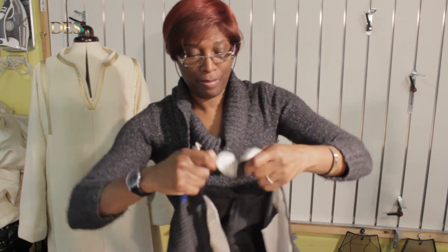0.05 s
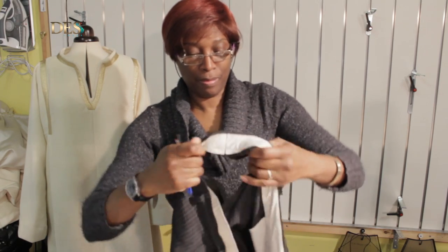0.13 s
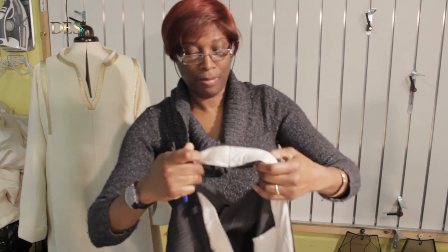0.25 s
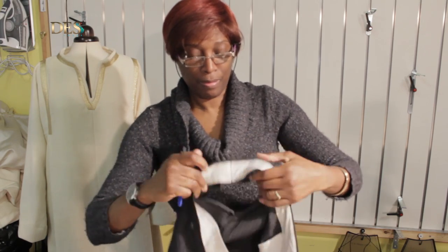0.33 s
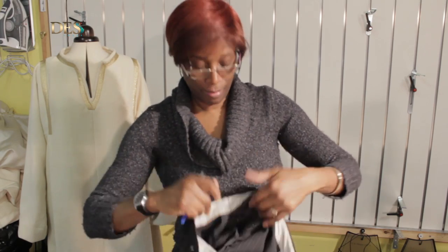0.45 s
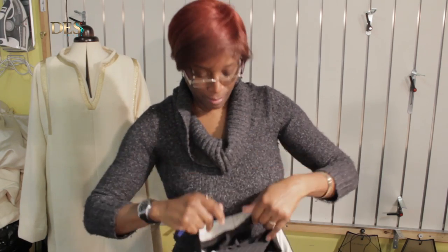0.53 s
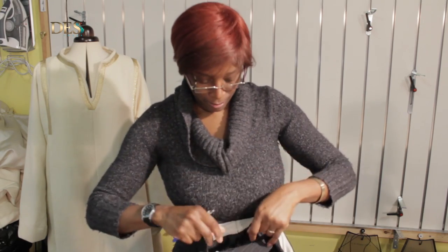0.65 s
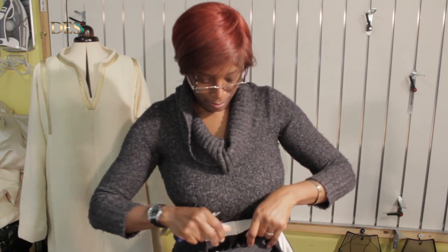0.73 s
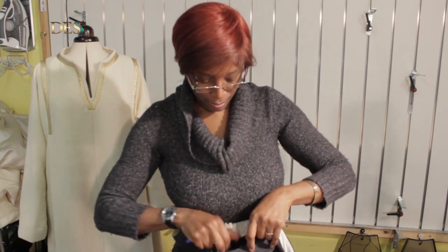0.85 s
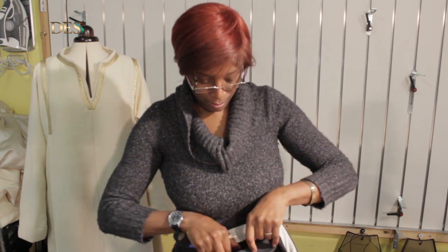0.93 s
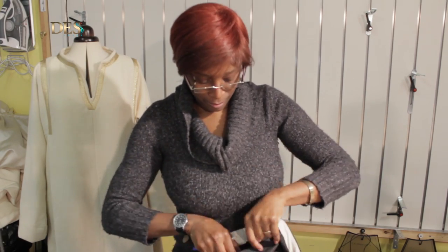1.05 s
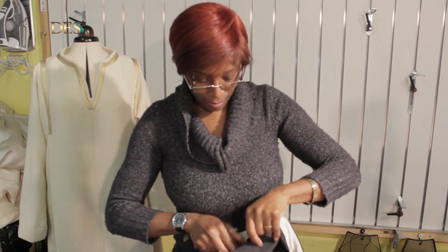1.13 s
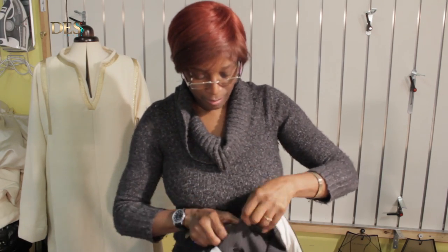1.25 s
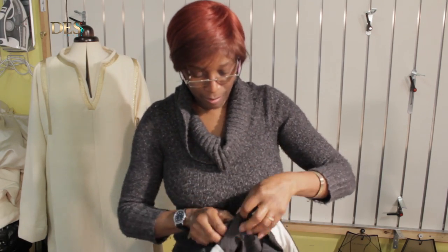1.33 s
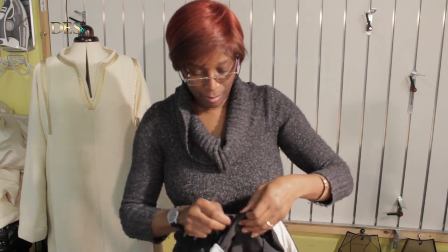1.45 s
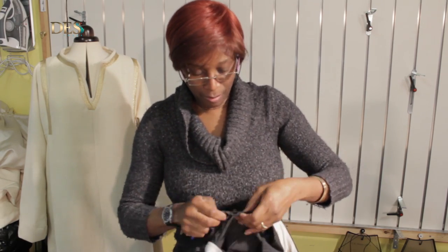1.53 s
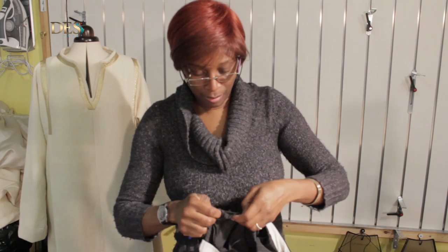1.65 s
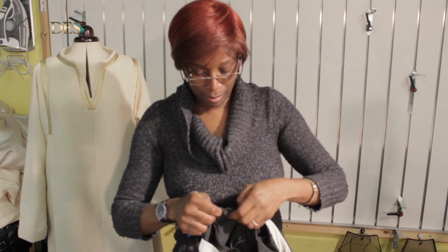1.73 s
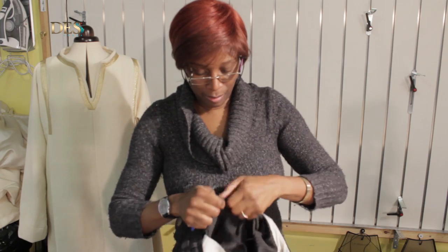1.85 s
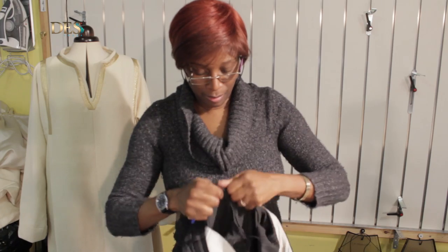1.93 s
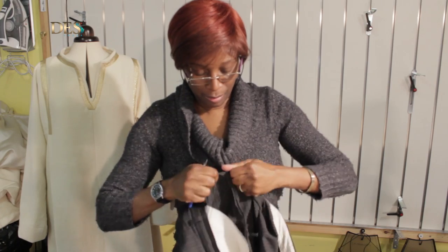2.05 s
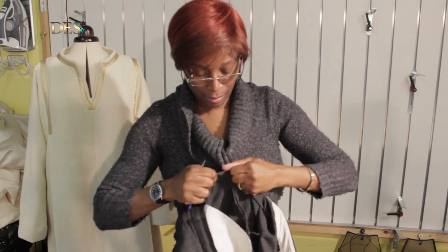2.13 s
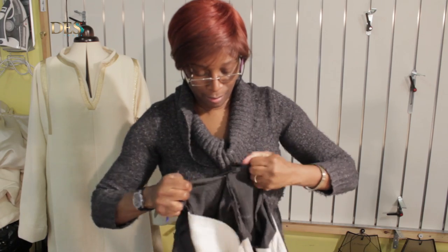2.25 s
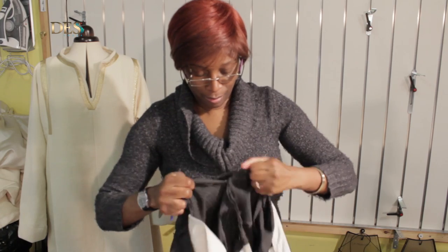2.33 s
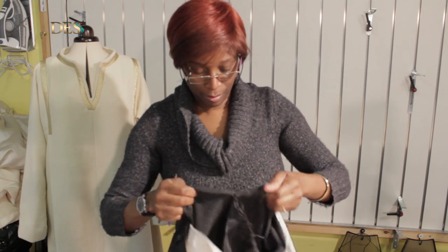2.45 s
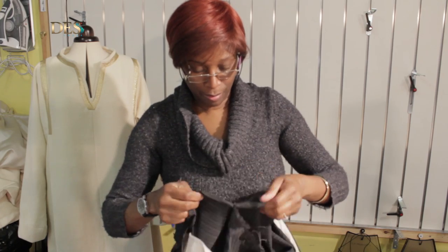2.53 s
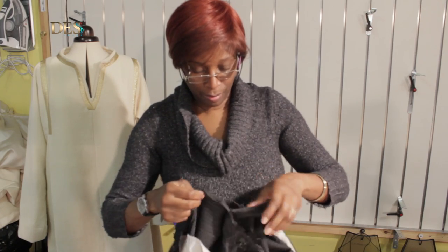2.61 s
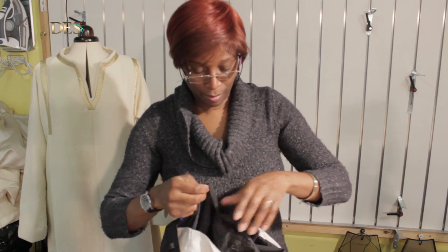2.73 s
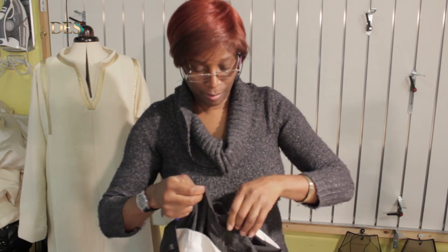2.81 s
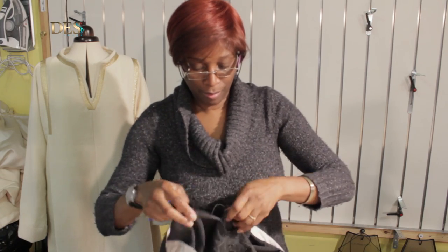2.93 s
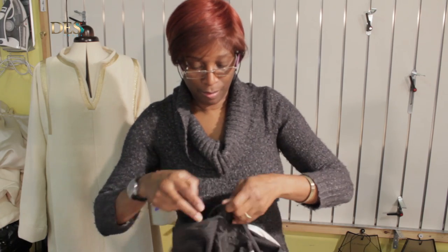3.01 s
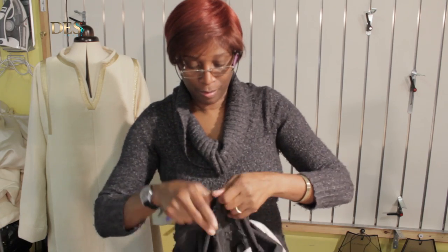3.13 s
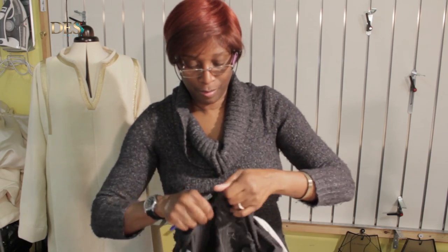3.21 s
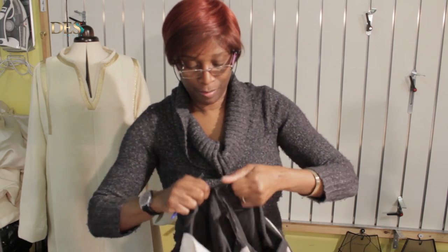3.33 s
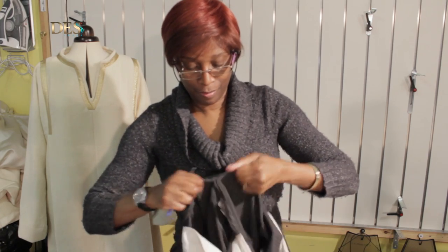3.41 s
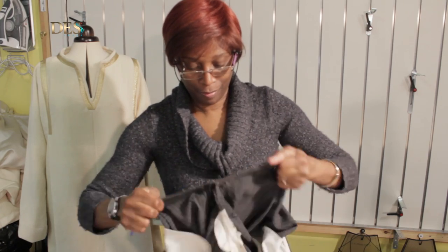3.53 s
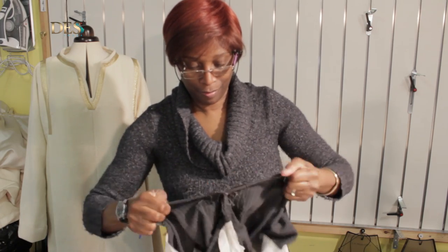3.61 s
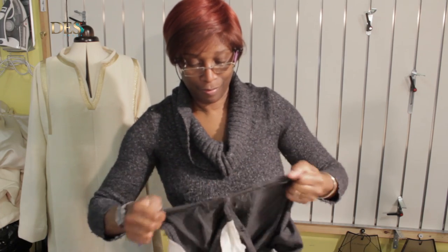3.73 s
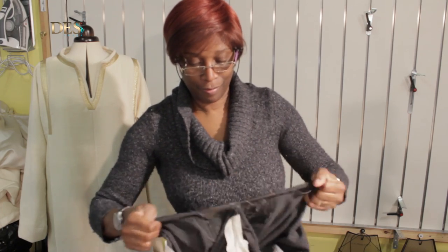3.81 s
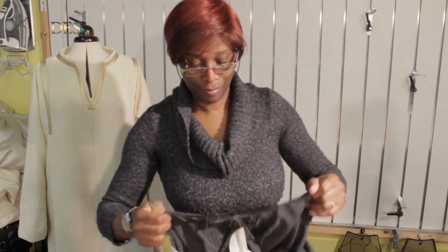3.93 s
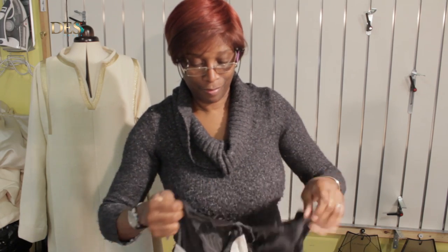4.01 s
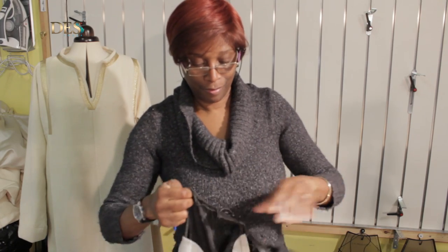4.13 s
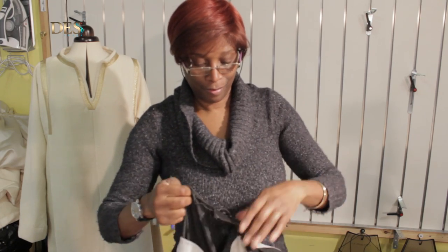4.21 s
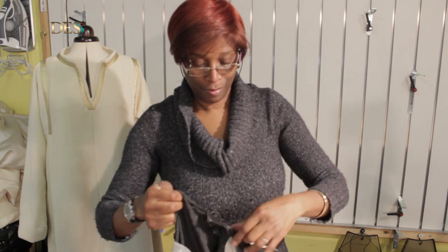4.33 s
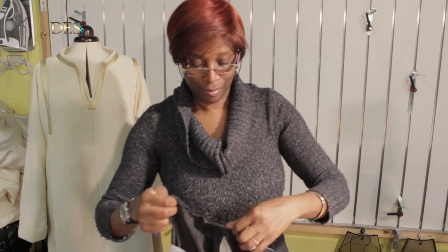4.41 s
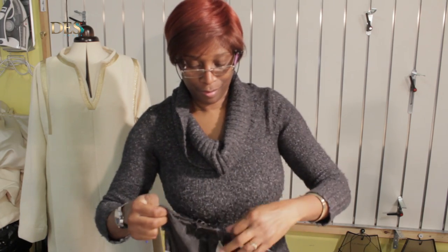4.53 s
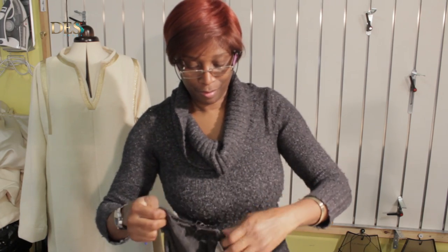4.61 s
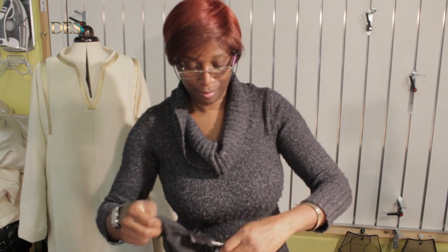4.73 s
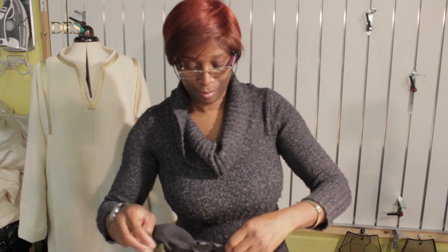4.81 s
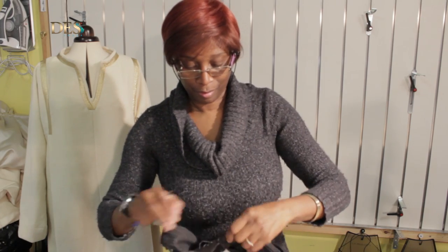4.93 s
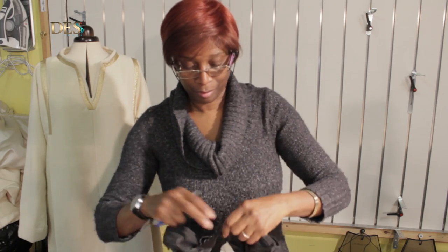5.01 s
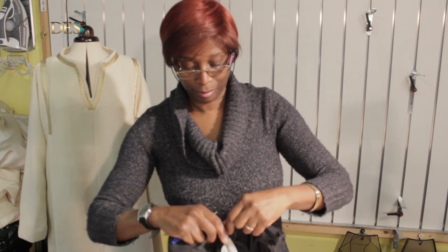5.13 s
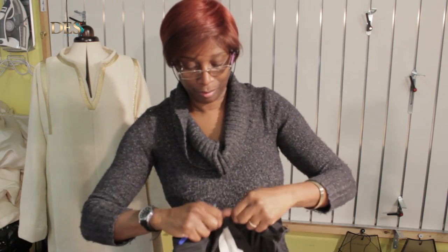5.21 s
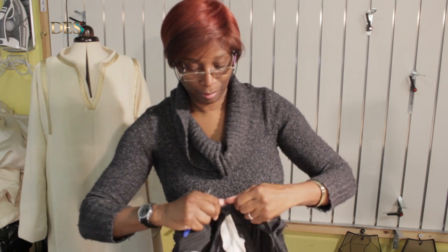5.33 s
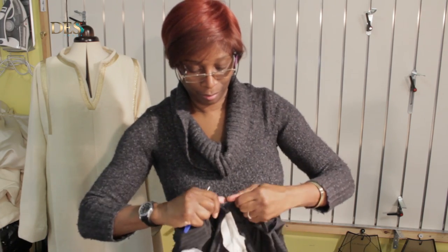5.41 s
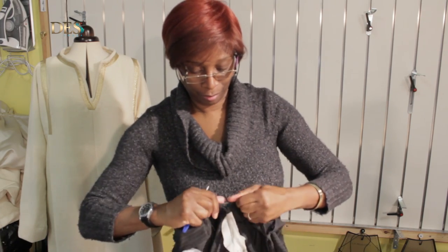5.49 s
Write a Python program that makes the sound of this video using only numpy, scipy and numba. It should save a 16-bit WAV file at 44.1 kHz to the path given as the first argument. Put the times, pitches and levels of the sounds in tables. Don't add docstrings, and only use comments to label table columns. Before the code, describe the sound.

Two hands tear a fabric seam at arm's length from a small stereo microphone. After a quiet, hissy start, stitches pop in a fast bright cluster, pause, then burst again in two closely spaced, louder clusters with dull cloth jerks. Short dry indoor reflections, wavering hum and faint handling rustles to the end.

```python
import sys
import numpy as np
from scipy import signal
from scipy.fft import rfft, irfft
from scipy.io import wavfile
from scipy.ndimage import uniform_filter1d
from numba import njit

SR = 44100
rng = np.random.default_rng(int(sys.argv[2]) if len(sys.argv) > 2 else 0)


def field_ratio(decibels):
    return 10 ** (np.asarray(decibels, dtype=float) / 20)


def int16_out(signal):
    q = np.round(np.clip(np.atleast_2d(signal).T, -1, 1) * 32767)
    wavfile.write(sys.argv[1], SR, q.astype(np.int16))


N = 245220


def colour(x, shape):
    hz, db = np.transpose(shape)
    f = np.maximum(np.fft.rfftfreq(x.shape[-1], 1 / SR), 1)
    gain = field_ratio(np.interp(np.log(f), np.log(hz), db))
    return irfft(rfft(x) * gain / np.sqrt(np.mean(gain ** 2)), x.shape[-1])


def high_pass(x, hz):
    return signal.sosfilt(signal.butter(2, hz, "high", fs=SR, output="sos"), x)


def decay(t, t60_s):
    return np.exp(-np.log(1000) * t / t60_s)


def walk(rate):
    k = int(SR / rate)
    steps = np.repeat(rng.standard_normal(N // k + 1), k)
    return 1.31 * uniform_filter1d(uniform_filter1d(steps, k), k)[:N]


def pair(alike):
    mid, side = rng.standard_normal((2, N))
    alike = np.clip(alike, 0, 1)
    opposite = side * np.array([[1], [-1]])
    return np.sqrt((1 + alike) / 2) * mid + np.sqrt((1 - alike) / 2) * opposite


def grains(per_s, spread_db, alike):
    happens = rng.random(N) < per_s / SR
    size = happens * field_ratio(spread_db * np.minimum(rng.exponential(size=N), 4))
    clicks = size * pair(alike)
    return clicks / np.sqrt(np.mean(clicks ** 2))


def swells(rows, rise_db_s, fall_db_s, index=2):
    t, power = np.arange(N) / SR, 0
    for row in rows:
        early = np.maximum(row[0] - t, 0)
        late = np.maximum(t - row[0] - abs(row[1]), 0)
        power = power + field_ratio(row[index] - rise_db_s * early - fall_db_s * late) ** 2
    return np.sqrt(power)


PORT_RING_DB = [-2, -15]


def ports(x):
    ring = signal.lfilter(*signal.iirpeak(10200, 3.9, fs=SR), x)
    return high_pass(x + field_ratio(np.c_[PORT_RING_DB]) * ring, 160)


# frequency in Hz, level in dB per Hz.
FRAY_SPECTRUM = [(350, -46), (600, -28), (2150, 2), (3390, -13.5), (4520, -13.5), (9240, 0.5), (9890, -6.5),
                 (12500, -3), (16000, -34)]


def crack(t, hz, fray_ms):
    port_lag_s = 1 / 40000
    fray_top = 2.75
    late = t - np.array([[0], [port_lag_s]])
    pitch = hz * np.array([[1.0], [.92]])
    pulse = -np.cos(2 * np.pi * pitch * late) * np.exp(-(late * pitch / .5) ** 2)
    noise = colour(rng.standard_normal((3, len(t))), FRAY_SPECTRUM)
    noise = signal.lfilter(*signal.butter(2, min(fray_top * hz, .45 * SR), fs=SR), noise)
    fray = np.exp(-np.where(t > 0, t, -3 * t) * 1000 / max(fray_ms, .05))
    return pulse + 0.5 * min(fray_ms, 1) * fray * (noise[0] + 0.84 * noise[1:])


PANEL_MODES = np.array([343, 567, 790, 1020, 1546])


def jerk(t, jerk_db):
    delay_s, pitch_chance, strength = 0.00107 * rng.random(), rng.random(5), 0.32 + rng.random(5)
    after = np.maximum(t - delay_s, 0)
    modes = PANEL_MODES * 1.43 ** (pitch_chance - .5)
    strength = strength * [0.95, -1.11, 1, 0.97, -0.8]
    ring = sum(g * np.sin(2 * np.pi * hz * after) for hz, g in zip(modes, strength))
    thump_hz = 250 * 1.63 ** (pitch_chance[0] - .5)
    thump = field_ratio(-38.5) * np.sin(2 * np.pi * thump_hz * after) * decay(after, 0.052)
    return field_ratio(jerk_db - 5.5) * ring * decay(after, 0.015) + thump


# time in seconds, peak level in dB, crack pitch in Hz, # cloth jerk in dB
# relative to the crack, fraying time in ms.
STITCHES = [(2.2661, -8, 8100, -19, 0.46), (2.2768, -6.5, 7440, -34, 0.21),
            (2.279, -13.5, 6740, -13.5, .15), (2.2933, -17, 6300, -8, 0.87),
            (2.3058, -7.5, 7300, -13.5, 0.13), (2.318, -17.5, 5100, -1, .62),
            (2.327, -16.5, 7200, -13, 0.51), (2.3284, -7, 6250, -13.5, 0.45),
            (3.5204, -10, 7900, -19.5, 0.44), (3.5296, -13, 5800, -14, .15),
            (3.5482, -19.5, 6500, -5.5, .49), (3.5765, -6.5, 6200, -18, 0.28), (3.6018, -7, 5900, -15, 0.3),
            (3.6308, 3, 6130, -22.5, 0.36), (3.8385, 8, 6430, -20.5, 0.14), (3.8503, -6, 4380, -15.5, 0.41),
            (3.8655, 6, 5040, -19.5, 0.32), (3.8944, 9, 5360, -21.5, 0.16)]
# time in seconds, peak level in dB,
# # crack pitch in Hz, cloth jerk in dB relative to the crack.
FAINT_SNAPS = [(0.0021, -26.5, 2900, -5.5), (0.0117, -22, 7100, -16), (0.0203, -31, 3780, -10),
               (2.2998, -32, 3000, 5), (2.3358, -19.5, 5700, -3), (2.3643, -23, 3150, -6.5),
               (2.3675, -26, 5700, -22), (3.263, -33.5, 6000, -10), (3.2714, -36, 3600, -25),
               (3.4886, -31, 2700, -3), (3.4971, -30, 4600, -2.5), (3.544, -27, 3600, -1.5),
               (3.5646, -21.5, 5800, -8), (3.5974, -24, 4900, -14), (3.6204, -28, 3400, -22),
               (3.8755, -23, 3100, -9), (3.8818, -33, 5200, -8), (3.891, -30, 6500, 6),
               (3.9064, -32, 4000, -19), (3.924, -30, 4300, -18)]


def snaps():
    faint_fray_ms, seam_pan_db = .6, 1.5
    t = np.arange(2048) / SR - .002
    out = np.zeros((2, N + len(t)))
    breaks = list(STITCHES) + [(*row, faint_fray_ms) for row in FAINT_SNAPS]
    for s, db, hz, jerk_db, fray_ms in breaks:
        side = field_ratio(db + np.array([[seam_pan_db], [-seam_pan_db]]) / 2)
        snap = side * (crack(t, hz, fray_ms) + jerk(t, jerk_db))
        at = int(round((s + t[0]) * SR))
        out[:, max(at, 0):at + len(t)] += snap[:, max(-at, 0):]
    return ports(out[:, :N])


# time of full strain in seconds, hold in seconds, fibre crackle in dB,
# cloth flap in dB, first break in seconds.
PULLS = [
    (0, 0.013, -37.5, -47.5, -.01),
    (2.322, .048, -38.5, -40, 2.268),
    (3.557, 0.08, -39, -50.5, 3.5),
    (3.848, 0.047, -51, -42, 3.5),
]


def strain(index):
    t, total = np.arange(N) / SR, 0
    for row in PULLS:
        opened = np.clip((t - row[4]) / 0.0032, 0, 1)
        total = total + swells([row], 228, 418, index=index) * opened
    return total


# frequency in Hz, level in dB per Hz.
FIBRE_SPECTRUM = [(600, -21), (1500, -7), (3000, -3), (6500, -3), (8500, -6), (11000, -17), (16000, -22)]


def fibres():
    return colour(grains(6000, 2.2, 0.28), FIBRE_SPECTRUM) * strain(index=2) * field_ratio(2.7 * walk(120))


# frequency in Hz, level in dB per Hz.
FLAP_SPECTRUM = [(120, -20), (260, -11.5), (700, 3), (1100, -3.5), (2400, -20.5)]


def flap():
    return colour(grains(600, 3.7, 0.82), FLAP_SPECTRUM) * strain(index=3) * field_ratio(2.2 * walk(60))


# left delay in ms, left level in dB, right delay in ms, right level in dB.
ECHOES = [(1.3, -8, 1.3, -5), (3.55, -10, 3.55, -10), (5.6, -16, 7.7, -15)]
# centre in Hz, decay time T60 in seconds, level in dB.
WALLS = [(253, 0.26, -24), (486, 0.2, -17), (1010, 0.19, -20), (2220, 0.16, -16), (4000, 0.22, -25.5),
         (6960, 0.18, -22), (11400, 0.2, -29.5), (16000, .06, -36)]
# frequency in Hz, decay time T60 in seconds, level in dB.
SHELF_RING = [(1174, .44, -58)]


def room(x):
    t = np.arange(SR // 2) / SR
    echo, tail = np.zeros((2, len(t))), 0
    for left_ms, left_db, right_ms, right_db in ECHOES:
        echo[0, int(left_ms * SR / 1000)] = field_ratio(left_db)
        echo[1, int(right_ms * SR / 1000)] = field_ratio(right_db)
    echo = signal.lfilter(*signal.butter(1, 7000, fs=SR), echo)
    dense = np.clip(0.13 + t / .06, 0, 1)
    hits = pair(0.47)[:, :len(t)] * (rng.random(len(t)) < dense) / np.sqrt(dense)
    log_hz = np.log(np.fft.rfftfreq(len(t), 1 / SR) + 1)
    centres = np.log(np.array(WALLS)[:, 0])
    for share, (hz, t60, db) in zip(np.eye(len(WALLS)), WALLS):
        band = irfft(rfft(hits) * np.interp(log_hz, centres, share), len(t))
        tail = tail + field_ratio(db) * band * decay(t, t60)
    tail = tail * np.clip(t / 0.0017, 0, 1) * field_ratio(-12.5)
    tail = tail * (1 + 1.58 * np.exp(-t / 0.01))
    ring = sum(field_ratio(db) * np.sin(2 * np.pi * hz * t) * decay(t, t60) for hz, t60, db in SHELF_RING)
    return signal.fftconvolve(x.mean(0, keepdims=True), echo + tail + ring, axes=1)[:, :N]


SWELL_RISE_DB_S, SWELL_FALL_DB_S = 300, 220
# time in seconds, hold in seconds, level in dB.
HUM_SWELLS = [(0, .005, -58), (.56, .04, -60), (.79, .03, -60), (1.08, .02, -62.5), (1.4, 0.36, -62),
              (2.14, .06, -64), (2.44, 0.11, -55), (2.68, 0.23, -67), (3.06, 0.38, -56), (3.56, .04, -50.5),
              (3.745, 0.083, -45.5), (3.93, 0.32, -58.5), (4.36, .2, -70), (4.69, .02, -63),
              (4.8, .02, -62), (5.0, .14, -64.5), (5.4, .16, -69)]


def hum():
    turn = 2 * np.pi * np.cumsum(66.6 * (1 + 0.0252 * walk(4.495))) / SR
    tone = np.sqrt(2) * np.sin(turn + np.array([[0], [.7]]))
    return tone * (field_ratio(-75.5) + swells(HUM_SWELLS, SWELL_RISE_DB_S, SWELL_FALL_DB_S))


# time in seconds, hold in seconds, level in dB.
DUCT_SWELLS = [(.33, .17, -54), (.68, 0.13, -51), (.96, 0.13, -55), (2.42, 0.074, -57), (2.7, .04, -68),
               (2.87, .02, -55), (2.97, .05, -50), (3.1, .4, -57), (3.57, 0.14, -55), (4.2, .1, -56),
               (5.18, .38, -63)]


def duct():
    centre_hz, half_width_hz = 291.2, 22
    edges = [centre_hz - half_width_hz, centre_hz + half_width_hz]
    drone = signal.sosfilt(signal.butter(2, edges, "band", fs=SR, output="sos"), pair(0.25))
    level = field_ratio(-68.5) + swells(DUCT_SWELLS, SWELL_RISE_DB_S, SWELL_FALL_DB_S)
    return drone / drone.std() * level * field_ratio(-8)


# frequency in Hz, level in dB per Hz.
AIR_SPECTRUM = [(20, -12), (60, -2), (130, -8.5), (204, -6), (290, -8.5), (380, -14.5), (620, -15),
                (725, -10), (1270, -11.5), (1650, -21), (2300, -21.5), (2950, -13), (3900, -25.5),
                (4930, -18), (5700, -32), (9000, -32)]


def air():
    level_db = -56.5 + 0.5 * walk(2.74) + np.array([[2.5], [-2.5]])
    return colour(pair(0.51), AIR_SPECTRUM) * field_ratio(level_db)


# frequency in Hz, level in dB per Hz.
HISS_SPECTRUM = [(20, 10), (200, 6.5), (1000, 3), (3000, -1), (7000, 1.5), (15000, -1)]


def hiss():
    return colour(pair(0), HISS_SPECTRUM) * field_ratio(-52)


# time in seconds, hold in seconds, level in dB.
RUSTLES = [(.17, .05, -60.5), (.245, 0.014, -52), (2.4, .02, -54), (2.5, 0.046, -59), (3.1, .07, -63),
           (3.262, .012, -53.5), (3.435, .01, -57), (4.365, .04, -62), (4.424, .015, -52.5),
           (4.52, .015, -59), (4.815, .012, -53), (4.87, .28, -60), (5.26, 0.056, -51.5), (5.38, .05, -55),
           (5.46, .05, -59)]


def rustle():
    level = swells(RUSTLES, 350, 350) * field_ratio(1.9 * walk(60) - 6)
    return colour(pair(0.96), FIBRE_SPECTRUM) * level


def scene():
    cracks = snaps()
    cloth = high_pass(fibres() + flap() + rustle(), 150)
    background = (hum() + duct()) * field_ratio(np.array([[.8], [-.8]])) + air() + hiss()
    faint = cloth + room(cracks + cloth) + background
    below_top = np.fft.rfftfreq(N, 1 / SR) < 15800
    return cracks + irfft(rfft(faint) * below_top, N)


@njit
def follow(x, attack, release):
    out, e = np.empty(len(x)), 0.
    for i in range(len(x)):
        e += (x[i] - e) * (attack if x[i] > e else release)
        out[i] = e
    return out


def top_cut(x):
    return signal.sosfilt(signal.butter(12, 17080, fs=SR, output="sos"), x)


def record(dry):
    limit_db, attack_s, release_s = -22, 0.0056, .24
    loud = follow(np.abs(dry).max(0), 1 / (attack_s * SR), 1 / (release_s * SR))
    gain = np.minimum(field_ratio(limit_db) / (loud + 1e-9), 1)
    mix = np.clip(dry * gain, -1, 1)
    return top_cut(mix)


dry = scene()
out = record(dry)
int16_out(out)
```